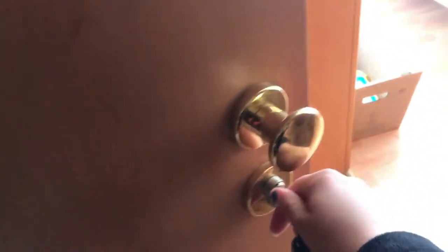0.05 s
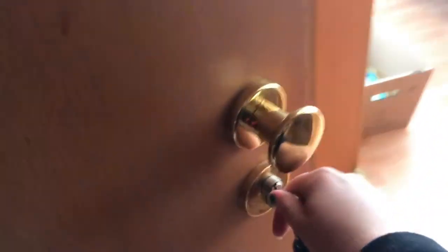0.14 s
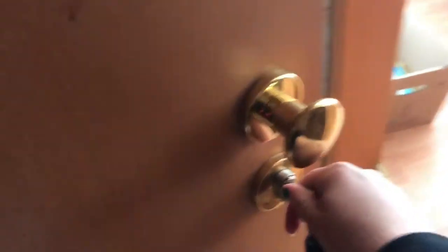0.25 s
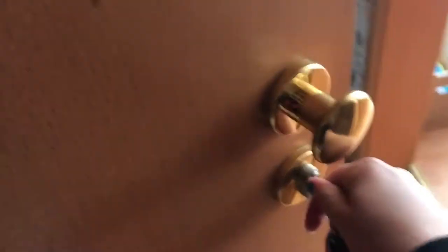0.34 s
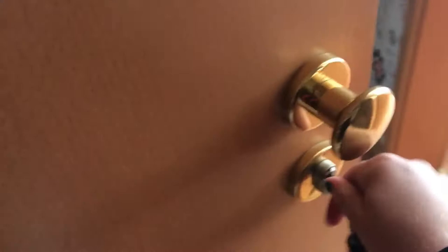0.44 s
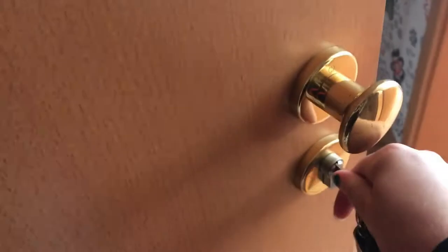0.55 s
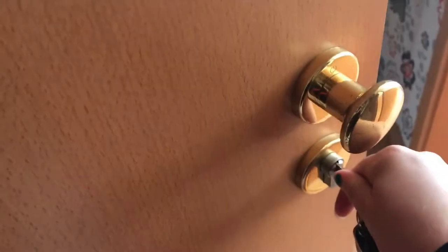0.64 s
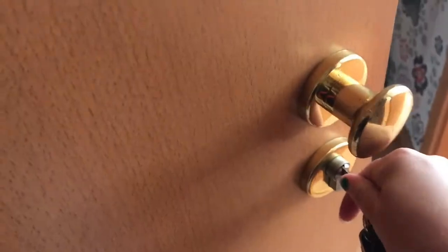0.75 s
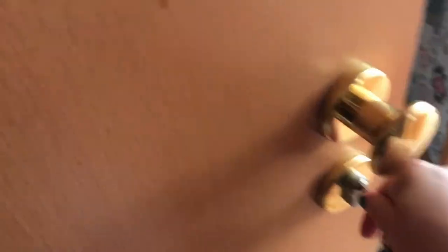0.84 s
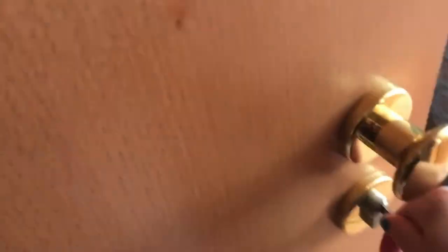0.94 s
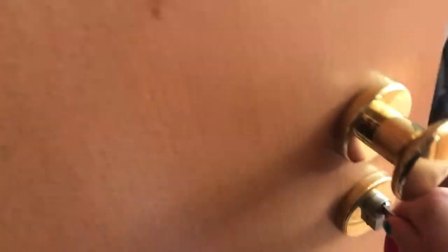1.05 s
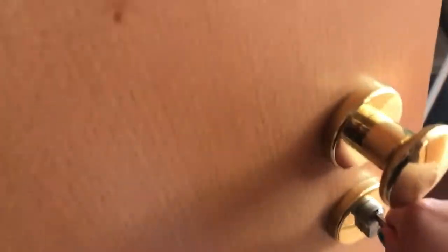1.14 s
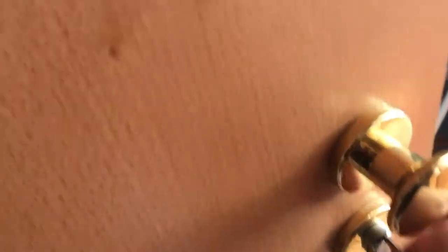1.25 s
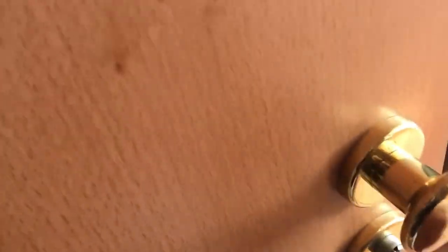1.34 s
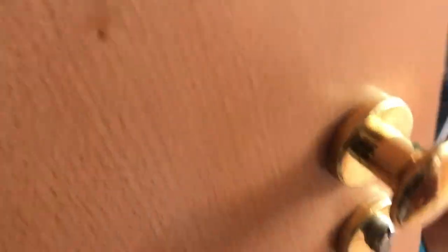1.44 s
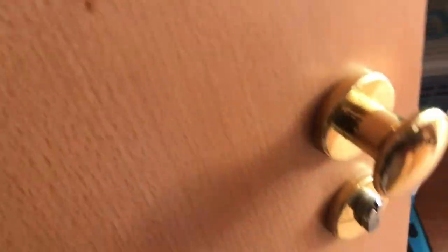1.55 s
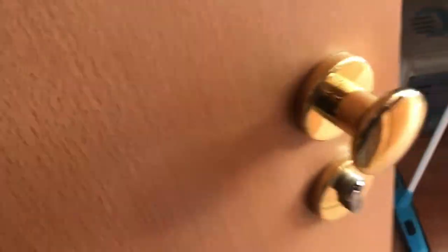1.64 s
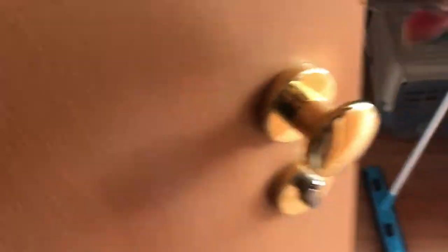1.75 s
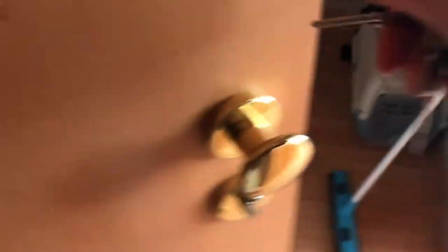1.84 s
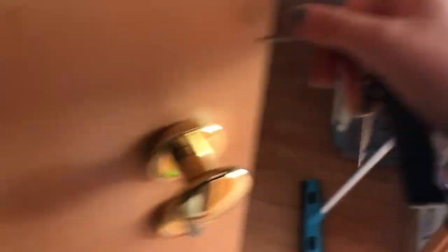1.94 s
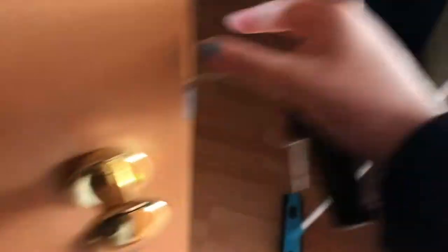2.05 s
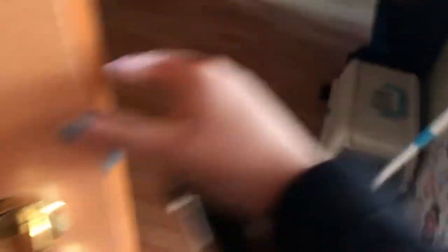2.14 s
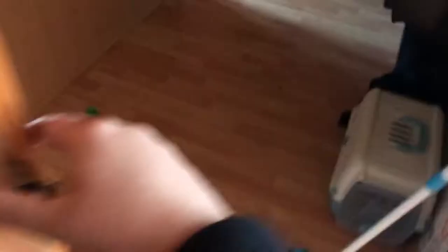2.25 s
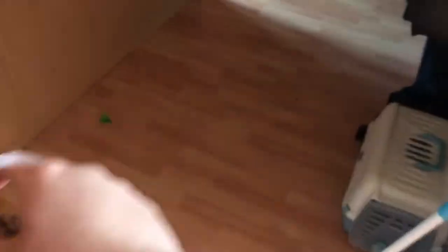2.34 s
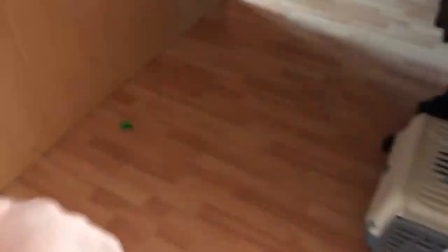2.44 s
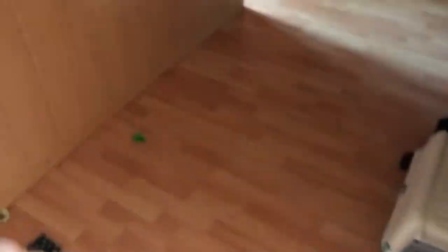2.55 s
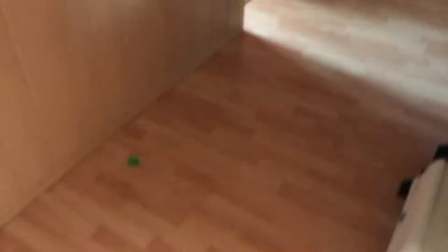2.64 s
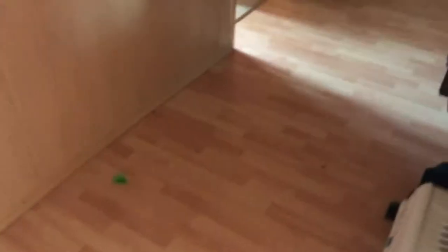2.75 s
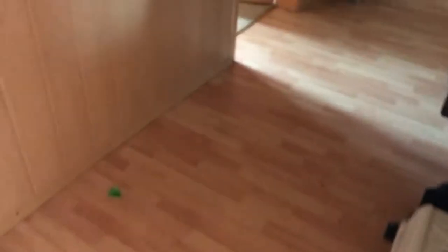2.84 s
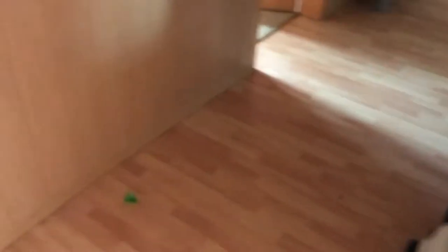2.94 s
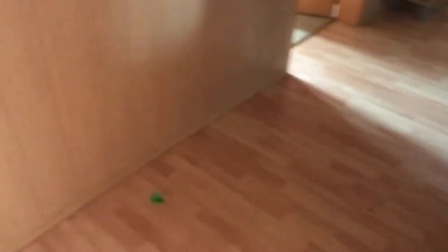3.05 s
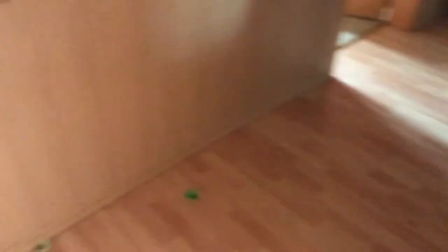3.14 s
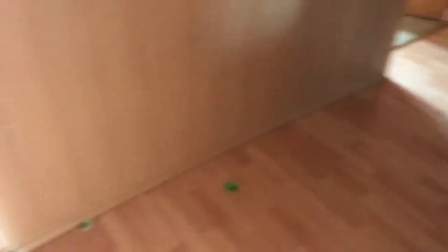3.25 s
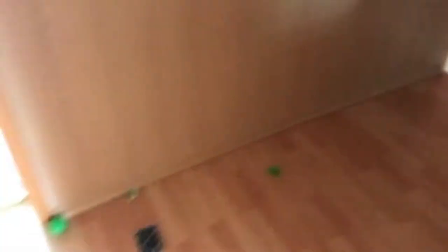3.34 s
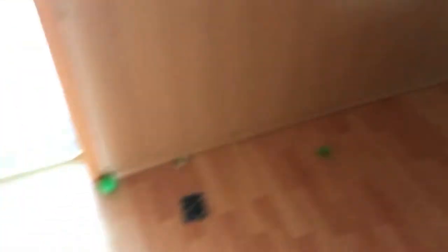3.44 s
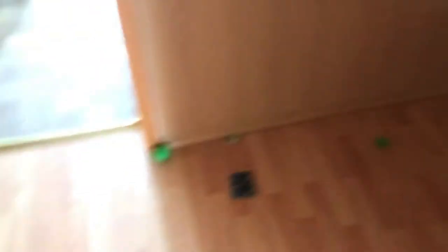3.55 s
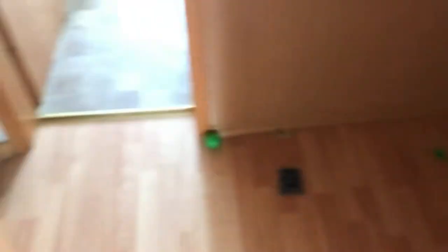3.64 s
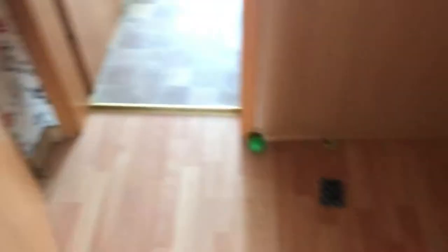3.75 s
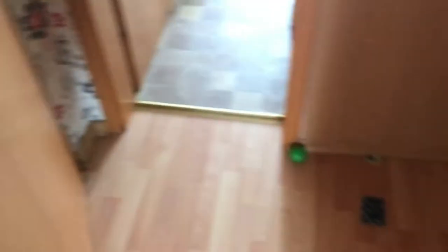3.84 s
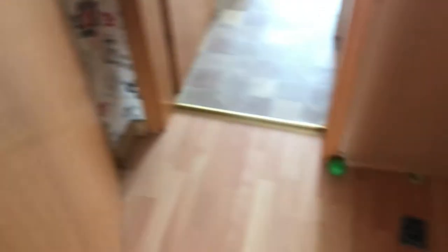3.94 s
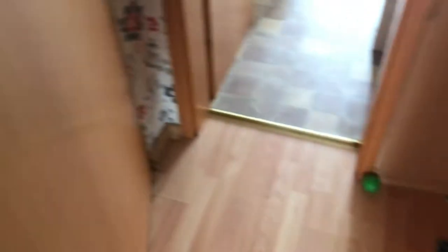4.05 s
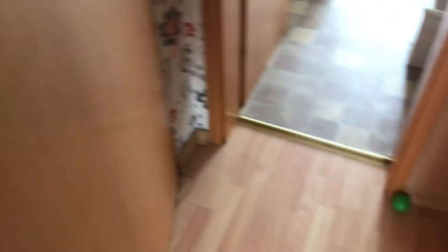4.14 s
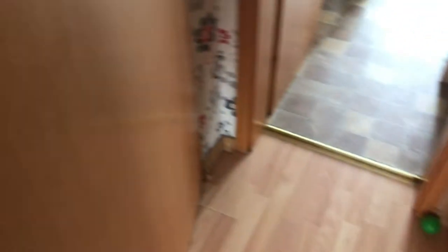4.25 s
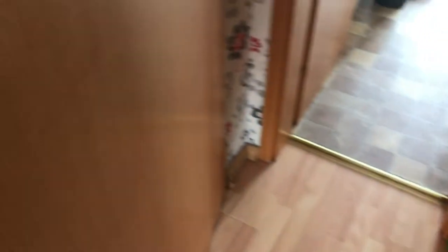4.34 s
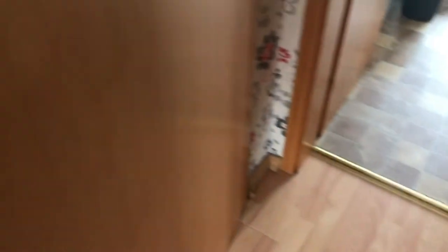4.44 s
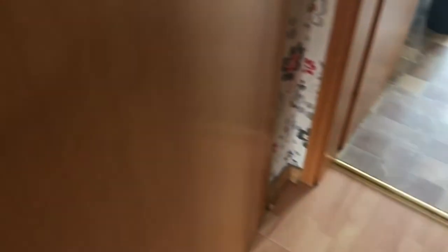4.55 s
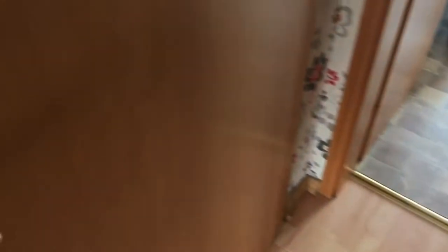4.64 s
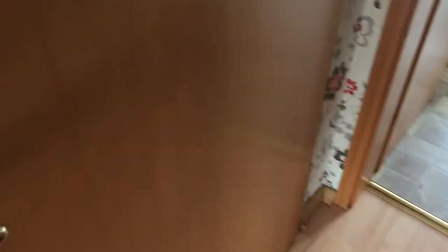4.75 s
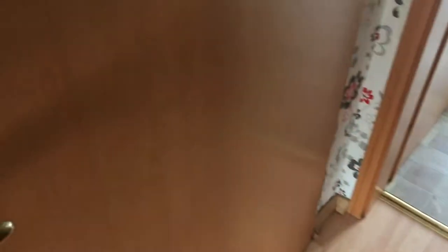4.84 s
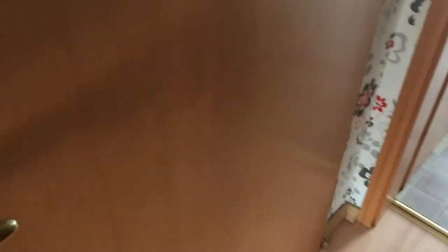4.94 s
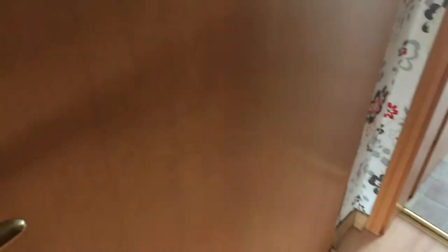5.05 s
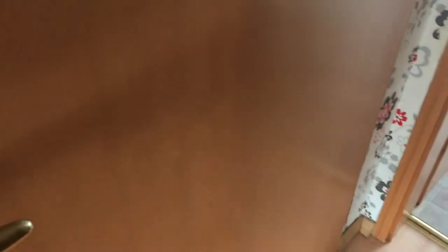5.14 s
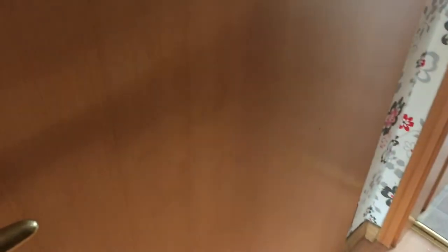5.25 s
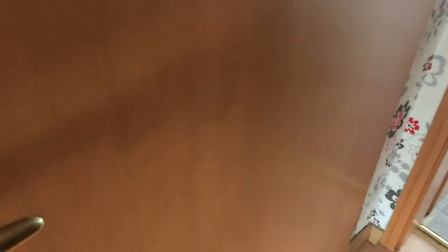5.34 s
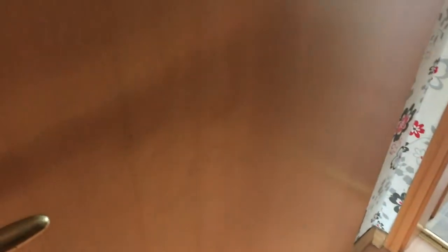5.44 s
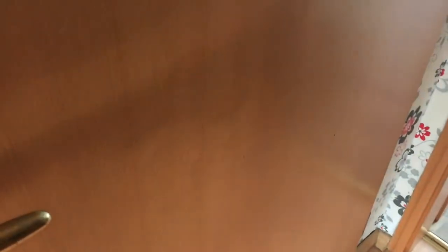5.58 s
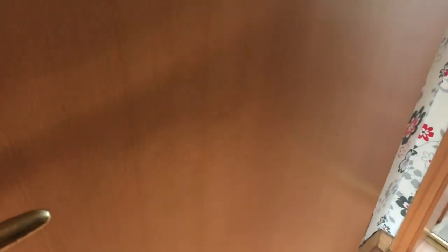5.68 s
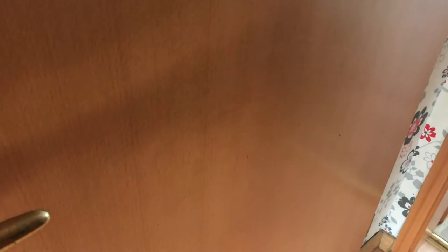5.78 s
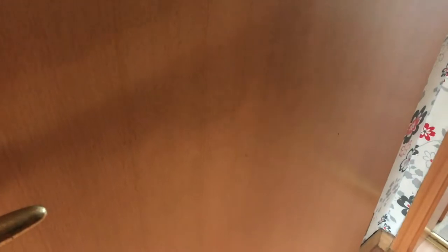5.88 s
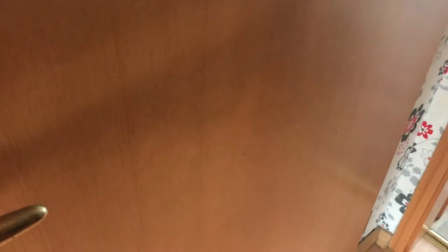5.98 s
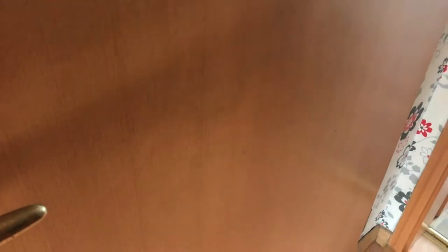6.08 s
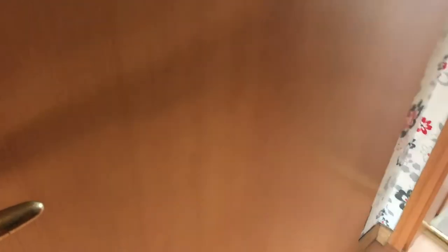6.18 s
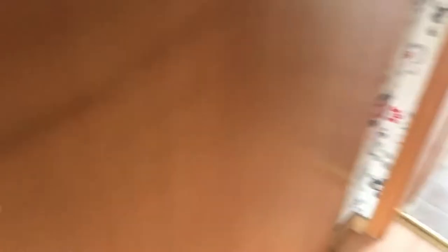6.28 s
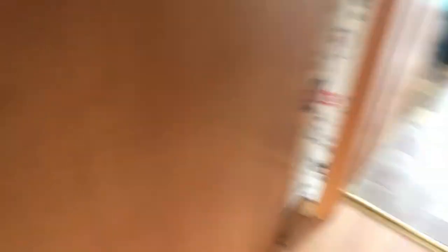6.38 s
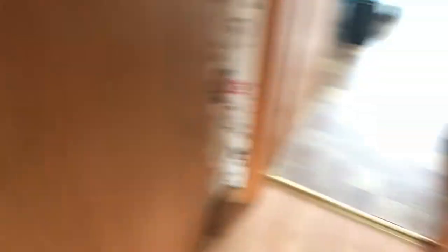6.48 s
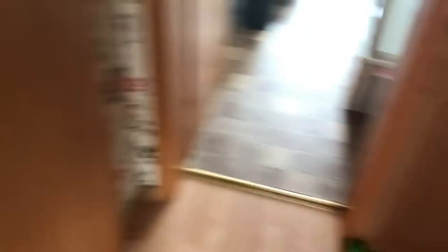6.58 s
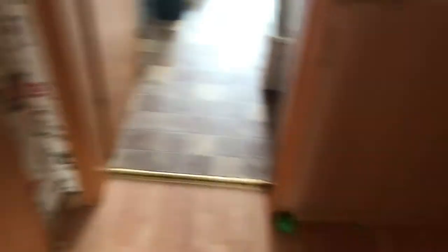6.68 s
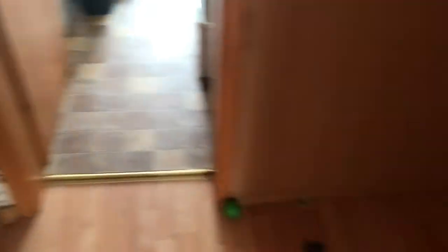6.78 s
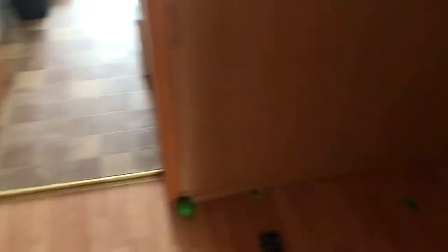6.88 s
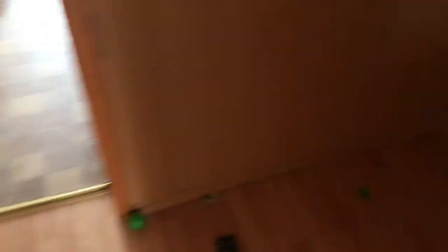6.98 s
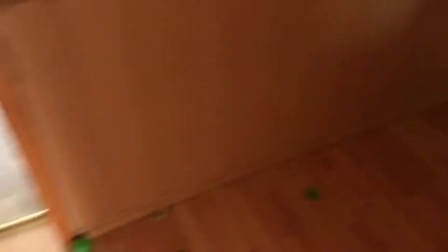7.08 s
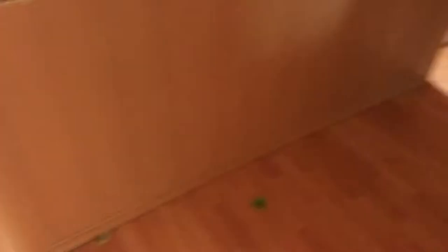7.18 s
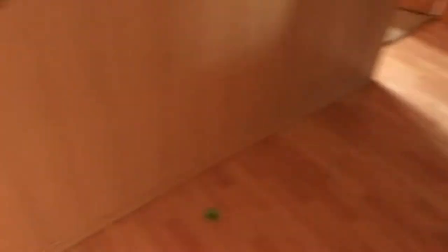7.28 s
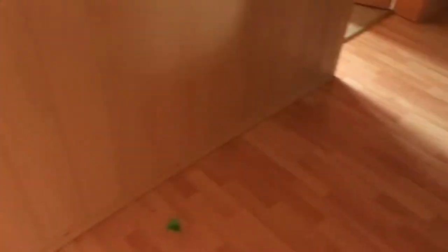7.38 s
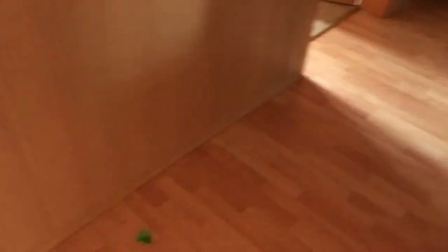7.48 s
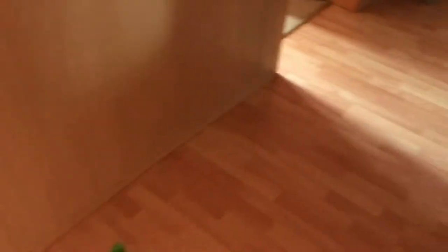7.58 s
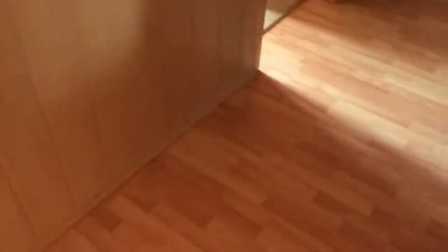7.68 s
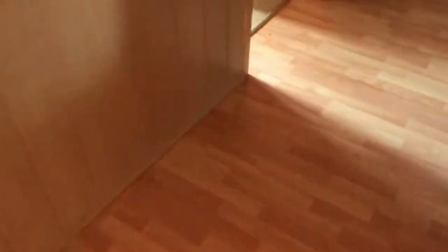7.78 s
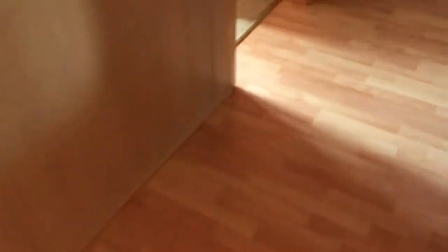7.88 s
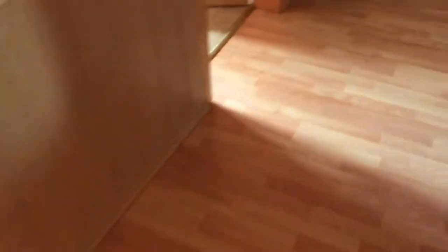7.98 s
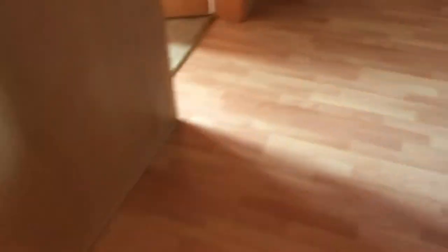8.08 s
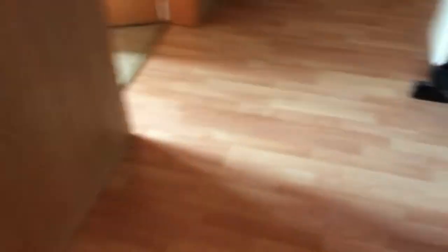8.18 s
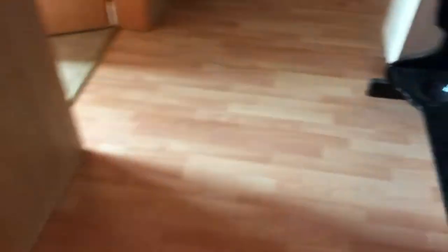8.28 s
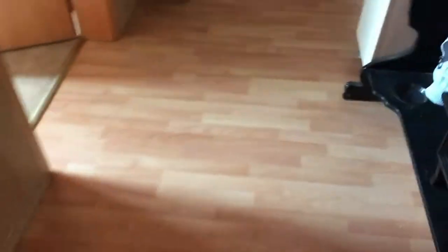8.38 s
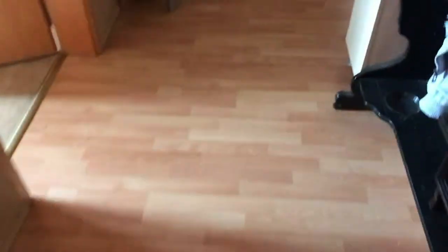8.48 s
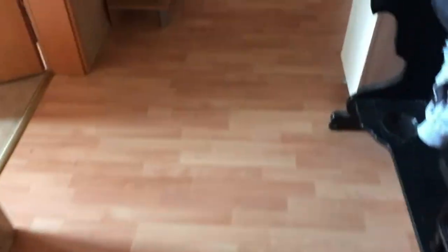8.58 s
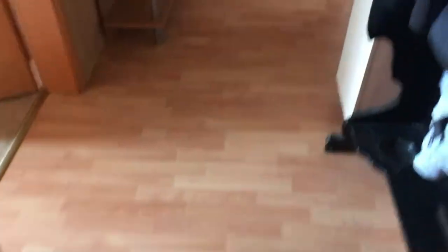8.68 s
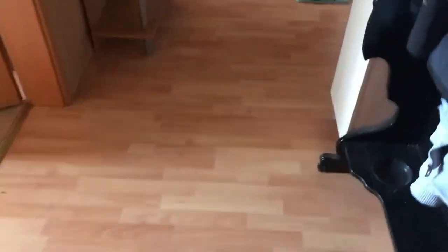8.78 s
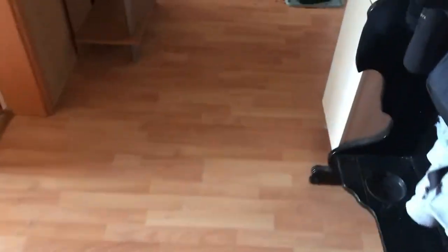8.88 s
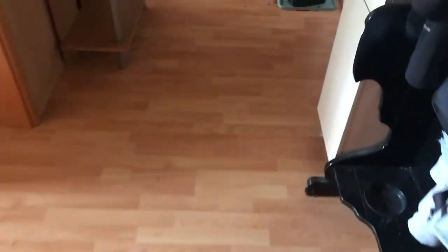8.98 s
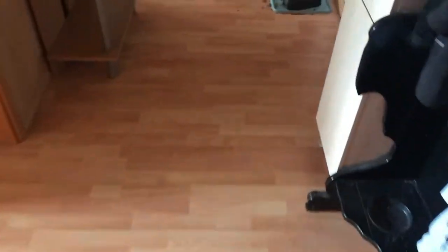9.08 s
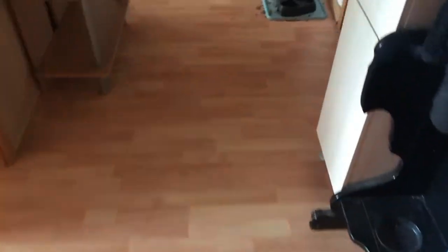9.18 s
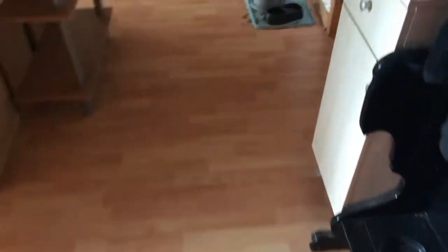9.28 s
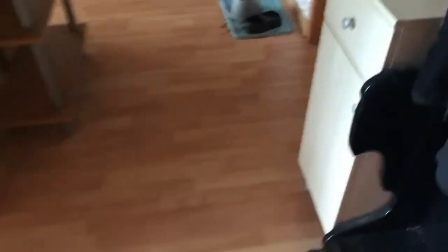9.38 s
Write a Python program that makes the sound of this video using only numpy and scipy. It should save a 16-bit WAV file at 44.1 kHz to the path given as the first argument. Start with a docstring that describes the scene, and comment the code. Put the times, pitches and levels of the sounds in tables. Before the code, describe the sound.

A close, carried microphone in a small hallway picks up low handling rumble and sleeve rustle throughout. From 0 to 0.7 s there are soft knocks, a faint squeak and bright key ticks at a lock. Around 0.9 s a short low creak and scrape come, then at 1.3 to 1.5 s a dense, sharp clatter of latch, key and wood. Small clicks and key ticks at 1.9 to 2.3 s mark the key coming out. It grows quiet, with rustling, a tick near 2.9 s and light clicks around 3.7 and 4.3 s. At 5.6 s the latch strikes with a crisp clack, and at 5.96 s the door slams: the loudest event, a heavy thud with metallic snap and short hallway ring. Keys jingle thinly at 6.6 to 7.2 s. Soft scuffs and faint steps follow from 7.6 s, then tiny squeaks near 8.9 s and a last scuff with a key tick at 9.2 s.

```python
"""A key is worked in the lock of a flat's wooden door: the latch clatters free and the key is pulled out.
The door swings, meets its latch and is pushed shut with a heavy thud that rings in the small hallway.
The bunch of keys jingles in the hand; sleeves rustle and soft steps cross the laminate floor.
Blows, rustle and friction are shaped noise, door, frame and keys add decaying sine modes, and squeaks
are gliding tones with a scrape; most events carry their own short hall tail."""
import sys
import numpy as np
from scipy import signal
from scipy.fft import rfft, irfft, next_fast_len
from scipy.io import wavfile
from scipy.ndimage import map_coordinates

SR = 44100
rng = np.random.default_rng(int(sys.argv[2]) if len(sys.argv) > 2 else 0)


def dump(signal):
    """Clip the signal to [-1, 1] and save it as 16-bit WAV at the path in sys.argv[1]."""
    limited = np.clip(np.atleast_2d(signal).T, -1, 1)
    pcm = np.round(limited * 32767).astype(np.int16)
    wavfile.write(sys.argv[1], SR, pcm)


N = 415422  # length of the scene [samples]
T = np.arange(SR) / SR  # time within one event [s]


def amp(db):
    """Decibels to gain."""
    return 10 ** (np.asarray(db) / 20)


def unit(x):
    """Scale x to rms 1."""
    return x / np.sqrt(np.mean(x ** 2) + 1e-20)


def along(points, hz):
    """Interpolate (frequency, value) points on a log frequency axis."""
    f, v = np.transpose(points)
    return np.interp(np.log(hz + 1), np.log(f), v)


def curve(rows):
    """Draw (time, level) points as one level per sample."""
    s, level = np.transpose(rows)
    return np.interp(np.arange(N) / SR, s, level)


def wobble(rate, size):
    """A smooth random curve with rate knots a second."""
    knots = rng.standard_normal(int(size * rate / SR) + 4)
    return map_coordinates(knots, [np.arange(size) * rate / SR])


def fade(t60):
    """A decay of 60 dB in t60 seconds."""
    return np.exp(-np.log(1000) * T / max(t60, 1e-3))


def rise(seconds):
    """The soft start of a contact, with its time constant in seconds."""
    return 1 - np.exp(-T / max(seconds, 1e-5))


def noise(gain_db, size):
    """Noise of rms 1 whose spectrum in dB is a function of frequency."""
    m = next_fast_len(size)
    spectrum = rfft(rng.standard_normal(m)) * amp(gain_db(np.fft.rfftfreq(m, 1 / SR)))
    return unit(irfft(spectrum, m)[:size])


def coloured(points, size=SR):
    """Noise of rms 1 with a (frequency, level) spectrum."""
    return noise(lambda hz: along(points, hz), size)


def bump(hz, centre_hz, steep_db):
    """A hump in dB, steep_db down one octave from its centre."""
    return -steep_db * np.log2((hz + 1) / centre_hz) ** 2


def ring(modes, scatter_db):
    """Sum damped sine modes of scattered strength and random phase, each followed for twice its t60."""
    out = np.zeros(SR)
    for hz, db, t60 in modes:
        t = T[T < 2 * t60]
        strength = amp(db + scatter_db * rng.standard_normal())
        decay = np.exp(-np.log(1000) * t / t60)
        out[:len(t)] += strength * decay * np.sin(2 * np.pi * (hz * t + rng.random()))
    return out


def add(track, s, sound):
    """Mix a sound into the track at s seconds."""
    part = track[round(s * SR):][:len(sound)]
    part += sound[:len(part)]


# decay of the small hallway: (frequency [Hz], t60 [s])
HALL_DECAY = [(60, 0.65), (300, 0.42), (1100, 0.45), (3000, 0.36), (6000, 0.28), (14000, 0.19)]


def in_hall(sound, wet_db):
    """Give a sound its own diffuse noise tail, the treble dying first."""
    hz, t, z = signal.stft(rng.standard_normal(SR), SR, nperseg=256)
    decay = np.exp(-np.log(1000) * t / along(HALL_DECAY, hz)[:, None])
    tail = signal.istft(z * decay, SR, nperseg=256)[1][:SR] * rise(0.0016)
    return sound + amp(wet_db) * signal.fftconvolve(sound, tail / np.linalg.norm(tail))[:SR]


# sleeve rustle: (time [s], relative level [dB])
RUSTLE_LEVEL = [(0.0, -59), (0.31, -74), (0.75, -64), (1.34, -58.5), (2.46, -67.5), (2.81, -62),
                (3.49, -69.5), (5.67, -68.5), (5.82, -63.5), (6.14, -59.5), (6.35, -64), (6.66, -65),
                (7.0, -61.5), (7.29, -65), (8.47, -61.5), (8.73, -70), (9.42, -62.5)]
# rubbing of the hands, and the slow fading of the blows near 1.35 s through the stairwell: (time [s], relative
# level [dB])
HANDLING_LEVEL = [(0.0, -54), (0.89, -55.5), (1.44, -44), (1.78, -54.5), (2.31, -60.5), (3.52, -69.5),
                  (3.99, -63), (4.75, -66.5), (5.64, -63.5), (5.82, -57), (6.09, -59), (6.38, -63.5),
                  (6.71, -69.5), (8.61, -63), (8.79, -69.5), (9.42, -63.5)]
# spectra of cloth, rubbing hands and microphone rumble: (frequency [Hz], relative level [dB])
CLOTH_SPECTRUM = [(600, -17), (2000, 2), (3500, 3), (7000, -3), (9000, -2), (10400, -9), (12000, -4),
                  (16000, -8.5)]
RUB_SPECTRUM = [(60, -14), (150, 2.5), (250, 3.5), (340, 4.5), (470, -2), (630, -2), (820, -5.5),
                (1100, -3), (1450, -8), (2000, -10), (3500, -22.5), (8000, -42)]
RUMBLE_SPECTRUM = [(20, -21.5), (40, -3.5), (70, 0), (120, -8), (250, -21.5), (600, -60.5)]
RUMBLE_DB, RUMBLE_GROWS = -64, 0.74  # rumble [dB] at average handling; dB gained per dB of rubbing


def movement():
    """Sleeves rustle and hands rub, while the blows near 1.35 s fade slowly through the stairwell; the carried
    microphone rumbles the more, the harder the handling."""
    rub_db = curve(HANDLING_LEVEL)
    rumble_db = RUMBLE_DB + RUMBLE_GROWS * (rub_db - rub_db.mean())
    folds = amp(1.8 * wobble(300, size=N) + 1.5 * wobble(22, size=N))
    cloth = amp(curve(RUSTLE_LEVEL)) * unit(coloured(CLOTH_SPECTRUM, size=N) * folds)
    rub_flutter_db = 1.8 * wobble(25, size=N) + 1.8 * wobble(140, size=N)
    rub = amp(rub_db - 0.5 + rub_flutter_db) * coloured(RUB_SPECTRUM, size=N)
    rumble = amp(rumble_db + 2.5 * wobble(14, size=N)) * coloured(RUMBLE_SPECTRUM, size=N)
    return cloth + rub + rumble


# dull knocks of steps, hand and door: (time [s], level [dB], pitch [Hz])
STEP_KNOCKS = [(0.172, -43.5, 266), (.457, -41, 480), (0.507, -35, 194), (0.622, -32, 356),
               (1.293, -24.5, 206), (1.944, -40.5, 172), (2.234, -30.5, 474), (3.747, -41, 297),
               (4.024, -46, 72.6), (5.611, -28.5, 155), (5.886, -33.5, 112), (5.974, -25.5, 160),
               (6.911, -38, 185), (7.796, -43, 473), (7.811, -43, 190), (8.355, -50, 515),
               (8.499, -45.5, 43), (8.649, -55.5, 400), (9.119, -45.5, 405)]
KNOCK_T60_S, KNOCK_HZ = 0.12, 252  # decay of a knock at this pitch
KNOCK_LINGER = 0.66  # power law by which deeper knocks last longer
KNOCK_RISE_CYCLES = 0.75  # time constant of the rise, in cycles of the knock's own pitch


def steps():
    """Soft contacts give one dull knock each; the deeper it is, the slower it rises and dies."""
    out = np.zeros(N)
    for s, db, centre_hz in STEP_KNOCKS:
        t60 = KNOCK_T60_S * (KNOCK_HZ / centre_hz) ** KNOCK_LINGER
        body = noise(lambda hz: bump(hz, centre_hz, steep_db=14.5), SR)
        knock = body * fade(t60) * rise(KNOCK_RISE_CYCLES / centre_hz)
        add(out, s, amp(db) * in_hall(knock, wet_db=-5.0))
    return out


# scuffs and snaps of key, sole and sleeve: (time [s], relative level [dB], slide t60 [s])
SCUFF_EVENTS = [(0.9272, -46.5, 0.2), (7.593, -39, 0.16), (7.755, -50, 0.81), (8.183, -45, .03),
                (8.274, -48.5, 0.077), (8.333, -43, .05), (8.4894, -40.5, 0.23), (9.188, -30.5, 0.14)]
# their gritty spectrum: (frequency [Hz], relative level [dB])
SCUFF_SPECTRUM = [(800, -20), (2200, -10.5), (3700, -2), (6000, -3), (8000, -5), (13000, -8), (16000, -9.5)]


def scuffs():
    """A short gritty slide that starts with a snap."""
    out = np.zeros(N)
    for s, db, t60 in SCUFF_EVENTS:
        slide = amp(-7.0) * fade(t60) + amp(-9.5) * fade(0.018)  # slide, then snap
        grit = amp(3.1 * wobble(500, size=SR))
        scuff = coloured(SCUFF_SPECTRUM) * slide * grit * rise(0.0012)
        add(out, s, amp(db) * in_hall(scuff, wet_db=-5.0))
    return out


# strokes of key, latch, hand and sleeve:
# (time [s], length [s], relative level [dB], centre [Hz], drop one octave from the centre [dB])
STROKES = [(0.921, 0.046, -46, 900, 9), (0.922, 0.038, -45.5, 7000, 0.5), (1.027, 0.098, -47, 5800, 1.5),
           (1.279, 0.016, -38, 4900, 6), (2.154, 0.079, -45.5, 2840, 13), (2.261, 0.82, -60, 736, 7),
           (2.553, 0.18, -57, 5000, 4), (2.562, 0.032, -49, 6300, 65), (3.075, 0.1, -52.5, 6360, 2),
           (3.767, 0.26, -57, 7000, -0.5), (4.978, 0.21, -65.5, 3180, 16), (6.995, 0.14, -49, 11800, 1.5),
           (7.096, 0.081, -53, 14100, 2500),]


def swishes():
    """Sliding contact: grainy friction that swells and stops with the stroke."""
    out = np.zeros(N)
    for s, length, db, centre_hz, steep_db in STROKES:
        stroke = np.interp(T / length, [0, .25, .75, 1], [0, 1, 1, 0])
        grain = amp(2.8 * wobble(600, size=SR))
        friction = unit(noise(lambda hz: bump(hz, centre_hz, steep_db), SR) * grain)
        add(out, s, amp(db - 3) * in_hall(friction * stroke, wet_db=-5.0))
    return out


# rubbing squeaks of seal and hinge:
# (time [s], length [s], start pitch [Hz], end pitch [Hz], level [dB], roughness [0-1])
SQUEAK_EVENTS = [(0.394, 0.2, 646, 607, -49, 0.61), (0.922, 0.19, 310.8, 288.7, -32, 0.55),
                 (4.757, 0.7, 2484, 2440, -70, 0.2), (5.267, 0.12, 1920, 1740, -53.5, 0.86),
                 (8.899, 0.14, 1730, 1650, -52, 0.54), (8.905, 0.11, 2190, 2080, -58.5, 0.8),
                 (9.063, 0.18, 1605, 1510, -57, 0.62)]


def squeaks():
    """Stick and slip at an unsteady rate that sinks as the push eases."""
    out = np.zeros(N)
    for s, length, start_hz, end_hz, db, rough in SQUEAK_EVENTS:
        glide = np.interp(T, [0, length], [start_hz, end_hz])
        pitch = glide * (1 + 0.14 * rough * wobble(780, size=SR))
        phase = 2 * np.pi * np.cumsum(pitch) / SR
        # every slip scrapes the wood
        rasp = unit(coloured(CLACK_SPECTRUM) * np.square(1 + np.cos(phase)))
        tone = np.sin(phase) + amp(-21.0) * np.sin(2 * phase) + amp(-18.5) * rasp
        ease = np.interp(T, [0, length / 4, length], [1, .45, .1], right=0)
        push = rise(0.0018) * ease * amp(3.0 * wobble(60, size=SR))
        add(out, s, amp(db) * in_hall(tone * push, wet_db=-8.0))
    return out


# shoves that set the whole leaf swaying: (time [s], sway level [dB], sway pitch [Hz], sway t60 [s],
# relative panel level [dB], place struck [0 lock to 1 edge])
DOOR_SHOVES = [(1.294, -40, 39, 1, -33, 0.12), (1.346, -31, 65.4, 0.34, -29, 0),
               (5.61, -33, 45.7, 0.94, -38, 1), (5.947, -21.5, 41, 0.42, -37.5, 0),
               (5.961, -13, 171, 0.057, -34.5, 0.71), (5.964, -14, 68.6, 0.22, -27, 1),
               (6.089, -39, 66.7, 0.64, -59, 1)]
# door panel modes: (frequency [Hz], level struck at the lock [dB], level struck at the edge [dB], t60 [s])
PANEL_MODES = [(77.3, -13, -6, 0.6), (144.2, -14.5, -4.5, 0.7), (176, -2.5, 1.5, 0.2),
               (218, -5.5, 4.5, 0.27), (252.5, -3, -6, 0.25), (301, -10.5, -9.5, 0.56),
               (366, -13.5, -3, 1.05), (427, -6, -15.5, 0.4), (594, -3, -11, 0.55), (650, 5, -6.5, 0.44),
               (894, 2, -8.5, 0.4), (1070, -5.5, -8, 0.75), (1150, -8.5, -15, 0.7), (2200, -4, -13, 0.19)]


def door():
    """The leaf sways against its latch while its panels ring on; the place struck decides which modes speak."""
    out = np.zeros(N)
    for s, db, hz, t60, panel_db, place in DOOR_SHOVES:
        sway = amp(db) * np.sin(2 * np.pi * hz * T) * fade(t60)
        modes = [(mode_hz, np.interp(place, [0, 1], [lock_db, edge_db]), mode_t60)
                 for mode_hz, lock_db, edge_db, mode_t60 in PANEL_MODES]
        flutter_db = 4.0 * wobble(49, size=SR)
        panel = amp(panel_db - 5.0 + flutter_db) * ring(modes, scatter_db=2.0)
        add(out, s, sway * rise(0.001) + in_hall(panel * rise(0.0011), wet_db=-18.5))
    return out


# the latch meets the strike plate: (time [s], level [dB], weight of the low modes [dB])
LATCH_STRIKES = [(5.610, -31, -5), (5.9623, -19.5, 0), (6.267, -52, -12)]
# frame and strike plate modes: (frequency [Hz], relative level [dB])
FRAME_MODES = [(218, 0.5), (310, -7), (360, -2.5), (850, -1), (1050, -6), (1205, 1), (1262, -1.5),
               (1570, -1), (1770, -0.5), (2220, -3), (2680, -6), (3300, 0)]
# the low modes need the weight of the whole door and last longer
FRAME_LOW_HZ, FRAME_LOW_T60_S, FRAME_T60_S = 500, 0.095, 0.065


def frame():
    """The latch strikes its plate: short modes of plate and frame, the low ones full only under a hard push."""
    out = np.zeros(N)
    for s, db, low_db in LATCH_STRIKES:
        modes = [(hz, level + low_db, FRAME_LOW_T60_S) if hz < FRAME_LOW_HZ else (hz, level, FRAME_T60_S)
                 for hz, level in FRAME_MODES]
        plate = ring(modes, scatter_db=1.7) * rise(0.00044)
        add(out, s, amp(db) * in_hall(plate, wet_db=-11.0))
    return out


def contacts(count):
    """One sharp touch, its rebound, and count weaker touches as neighbouring keys follow."""
    touch = fade(0.0049) * rise(.0001)
    touches = touch + amp(-10.5) * np.roll(touch, int(SR * rng.uniform(.002, .005)))
    for _ in range(count):
        follower_gain = amp(-22.5 + 3.0 * rng.standard_normal())
        touches += follower_gain * np.roll(touch, int(SR * rng.uniform(0.003, 0.023)))
    return touches


# key contacts: (time [s], relative level [dB], centre [Hz], relative chime level [dB])
KEY_CONTACTS = [(0.5079, -24.5, 8400, -17), (0.5367, -33, 3400, -5), (0.5704, -31, 5300, -10),
                (0.6475, -26.5, 4670, -13.5), (0.685, -27, 6500, -12.5), (1.168, -22.5, 4400, -18),
                (1.3157, -22.5, 8400, -17), (1.328, -27.5, 8400, -14), (1.339, -25, 8400, -14),
                (1.3487, -11, 6000, -15), (1.381, -13, 4300, -17), (1.388, -20.5, 6940, -26),
                (1.4211, -22, 6400, -25), (1.8708, -23.5, 3980, -22.5), (1.892, -35.5, 4200, -15),
                (1.931, -36.5, 4000, -12), (2.014, -32, 13600, -20), (2.032, -31.5, 3500, -25),
                (2.8723, -43, 11000, -14), (3.953, -45, 6200, -30), (4.177, -33, 4200, -22),
                (4.558, -41.5, 8600, -22.5), (5.772, -41, 7500, -30), (5.84, -40, 6040, -42),
                (6.599, -35.5, 4700, -28), (6.6058, -26, 5500, -37), (6.6138, -32, 4400, -33),
                (6.7238, -38, 3570, -30), (6.78, -41, 15000, -15), (6.796, -32, 7500, -25),
                (6.8302, -38.5, 3630, -33.5), (6.916, -28.5, 8000, -24), (6.924, -31, 2900, -22),
                (6.944, -37.5, 2530, -24), (7.0237, -22, 9500, -28), (7.0445, -25.5, 9380, -25.5),
                (7.0826, -24, 13900, -23), (7.084, -33, 2900, -22), (7.1758, -30.5, 12000, -23),
                (9.0093, -38, 13730, -18), (9.1909, -22.5, 4050, -29)]
# modes of one key held in the lock: (frequency [Hz], relative level [dB])
HELD_KEY_MODES = [(3130, -5), (3380, 0), (4300, -8), (5500, -1), (7190, -4), (8500, -2.5), (9670, -11),
                  (11710, -4.5), (14100, -8)]
# modes of the bunch hanging free: (frequency [Hz], relative level [dB])
FREE_KEY_MODES = [(2760, -5), (3435, -4), (4050, -7), (6150, -4), (8350, -2), (9550, 0), (10550, -5.5),
                  (11900, -6), (13750, -0.5), (14060, 1.5), (14340, 0.5), (15430, -8)]
KEYS_FREE_S = 2.5  # from here the keys hang from the hand and ring longer
HELD_T60_S, FREE_T60_S = .045, .12  # the fingers damp a held key
KEY_DETUNE = .015  # the grip shifts each mode by about this fraction


def keys():
    """Keys tick on lock and ring: a sharp contact, a brief ping, then a held key's ring or the bunch's chime."""
    out = np.zeros(N)
    for s, db, centre_hz, chime_db in KEY_CONTACTS:
        if s < KEYS_FREE_S:
            table, t60, touches = HELD_KEY_MODES, HELD_T60_S, contacts(count=0)
        else:
            table, t60, touches = FREE_KEY_MODES, FREE_T60_S, contacts(count=3)
        no_bass = [(900, -20.5), (3500, -5.5)]  # small metal has no bass
        tick = noise(lambda hz: bump(hz, centre_hz, steep_db=2) + along(no_bass, hz), SR) * touches
        ping = noise(lambda hz: bump(hz, centre_hz, steep_db=300), SR) * fade(.018) * rise(.0003)
        modes = [(hz * (1 + KEY_DETUNE * rng.standard_normal()),
                  level + bump(hz, centre_hz, steep_db=3.0), t60) for hz, level in table]
        chime = ring(modes, scatter_db=4.5)
        key = amp(-1.5) * tick + amp(-11.0) * ping + amp(chime_db - 4.5) * chime
        add(out, s, amp(db) * in_hall(key, wet_db=-14.5))
    return out


# lock, latch and door blows:
# (time [s], relative metal click level [dB], relative wooden clack level [dB], clack pitch [Hz])
LOCK_BLOWS = [(0.6171, -39, -36, 675), (1.2922, -20, -26, 1400), (1.3146, -18, -33, 564),
              (1.3443, -16.5, -26, 633), (1.3561, -18.5, -23.5, 644), (1.3804, -15.5, -26, 1830),
              (1.3892, -18, -37, 900), (1.4207, -22.5, -38, 665), (1.497, -22.5, -44, 665),
              (2.003, -41, -48.5, 1180), (2.14, -39.5, -47.5, 655), (2.1645, -28.5, -42.5, 960),
              (2.228, -38, -36, 680), (2.8713, -35, -56, 1100), (3.7372, -70, -39, 1150),
              (4.3039, -36.5, -52.5, 2130), (4.357, -35, -43, 1700), (5.3278, -49, -47, 1420),
              (5.6045, -21, -35, 2170), (5.610, -15.5, -28.5, 1230), (5.7438, -34, -42.5, 1700),
              (5.959, -5, -26, 1100), (5.9611, -5, -27, 1100), (5.966, -16, -27, 900),
              (6.267, -43, -45.5, 1210)]
# spectra of click, clack and thud: (frequency [Hz], relative level [dB])
CLICK_SPECTRUM = [(1200, -46), (2300, -1.5), (3000, 3), (4200, 0), (5400, -4.5), (7500, -9.5), (10000, -15),
                  (13500, -15), (16000, -18.5)]
CLACK_SPECTRUM = [(200, -29), (420, 4), (650, 0), (1200, 1.5), (1500, 1), (2300, -1.5), (3200, -12.5),
                  (6000, -43)]
THUD_SPECTRUM = [(25, -16), (70, 2), (120, -1), (175, -1), (240, -7), (350, -7), (500, -16), (900, -40)]
BOLT_FREE_S = 1.8  # until here the key holds the bolt back
GRIPPED_RATTLE_DB, LOOSE_RATTLE_DB = -17, -10.5  # rattle with the key holding the bolt, and without


def lock():
    """Each blow: a steel click with a rattle, and a clack of dense wood modes driving a slower frame thud."""
    out = np.zeros(N)
    for s, click_db, clack_db, clack_hz in LOCK_BLOWS:
        rattle_db = GRIPPED_RATTLE_DB if s < BOLT_FREE_S else LOOSE_RATTLE_DB
        # first contact, then loose parts rattling
        snap = amp(-3.0) * fade(0.0052) + amp(rattle_db) * fade(0.048)
        click = amp(click_db) * coloured(CLICK_SPECTRUM) * snap * rise(0.00015)
        wood = noise(lambda hz: along(CLACK_SPECTRUM, hz) + bump(hz, clack_hz, steep_db=8.0), SR)
        clack = amp(clack_db + 4.0) * wood * fade(0.058) * rise(0.0013)
        thud = amp(clack_db - 5) * coloured(THUD_SPECTRUM) * fade(0.096) * rise(0.00024)
        add(out, s, in_hall(click, wet_db=-9.0) + in_hall(clack + thud, wet_db=-5.5))
    return out


def scene():
    """Everything in the hallway, at one microphone."""
    background = movement() + steps() + scuffs() + swishes() + squeaks()
    return (background + door() + frame() + keys() + lock())[None]


TOP_HZ = 16000  # band limit of the microphone


def record(dry):
    """The microphone rounds off hard peaks towards 0.8 and keeps nothing above its band limit."""
    rounded = dry / (1 + (dry / .8) ** 4) ** .25
    m = next_fast_len(N + SR)
    in_band = np.fft.rfftfreq(m, 1 / SR) < TOP_HZ
    return irfft(rfft(rounded, m) * in_band, m)[..., :N]


dry = scene()
out = record(dry)
dump(out)
```